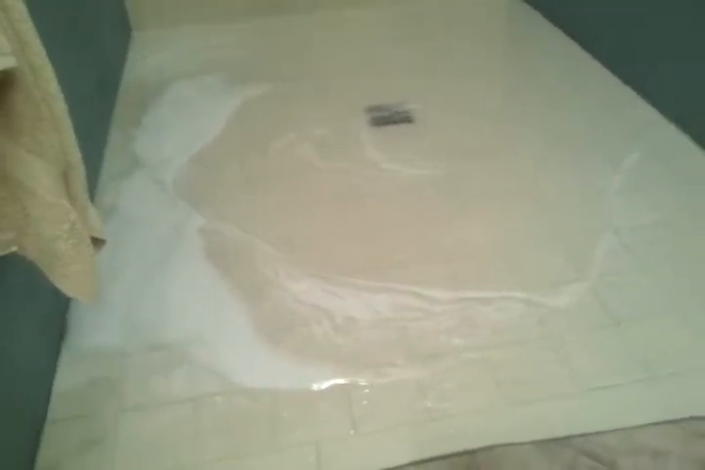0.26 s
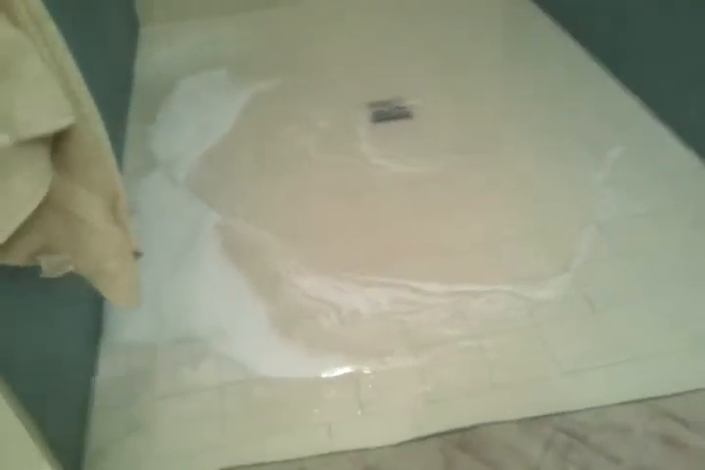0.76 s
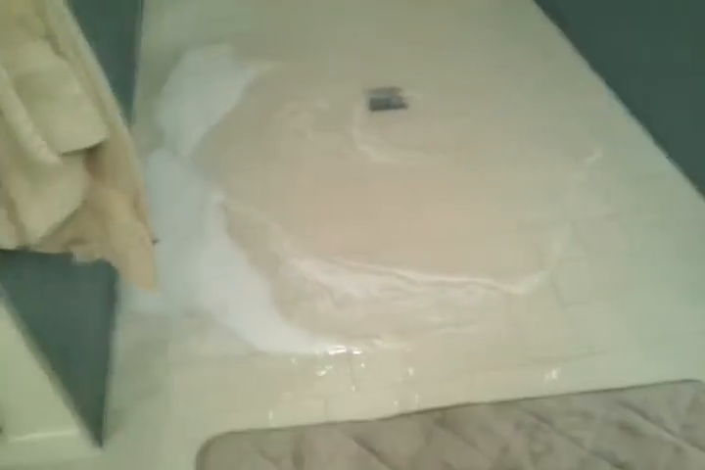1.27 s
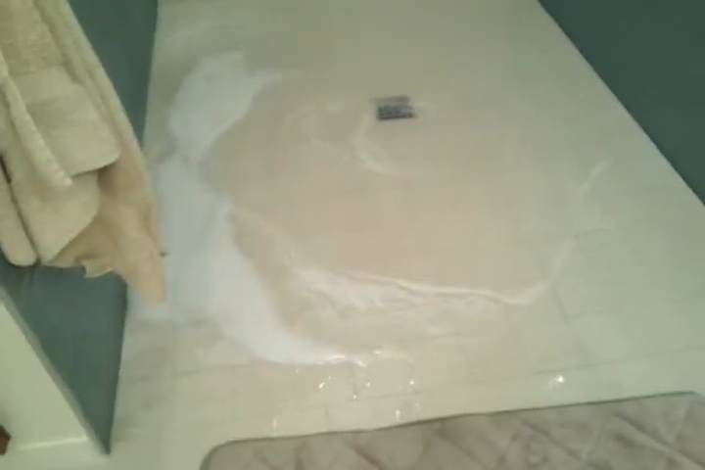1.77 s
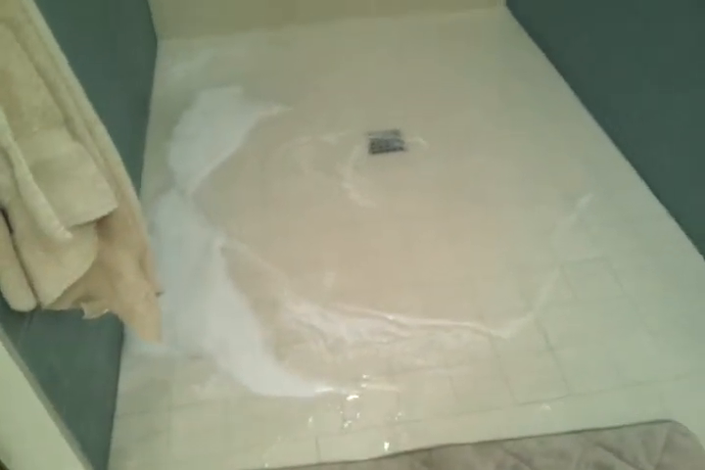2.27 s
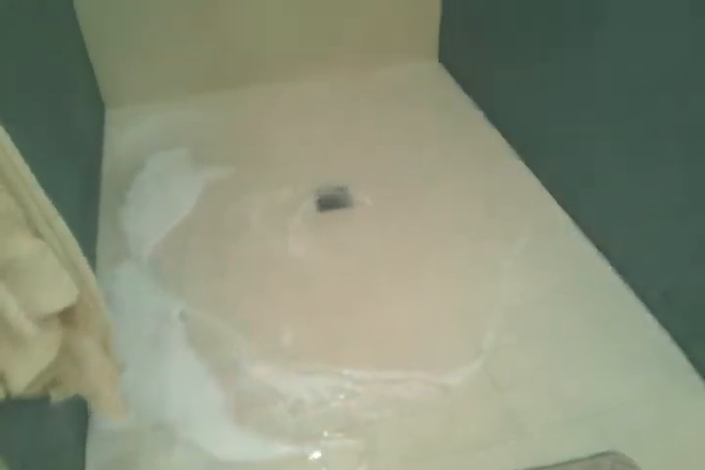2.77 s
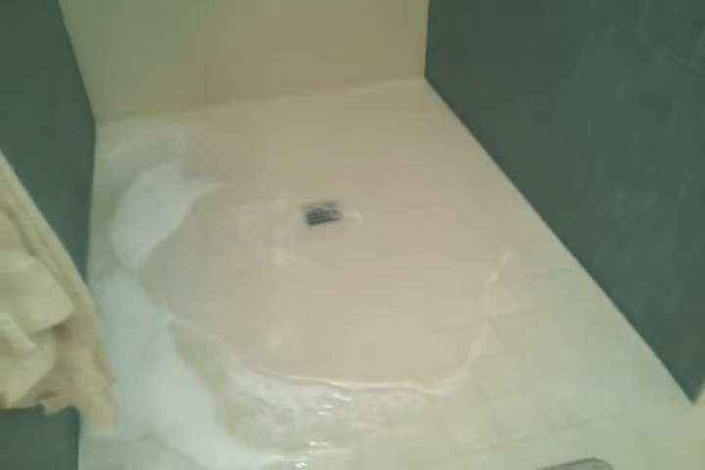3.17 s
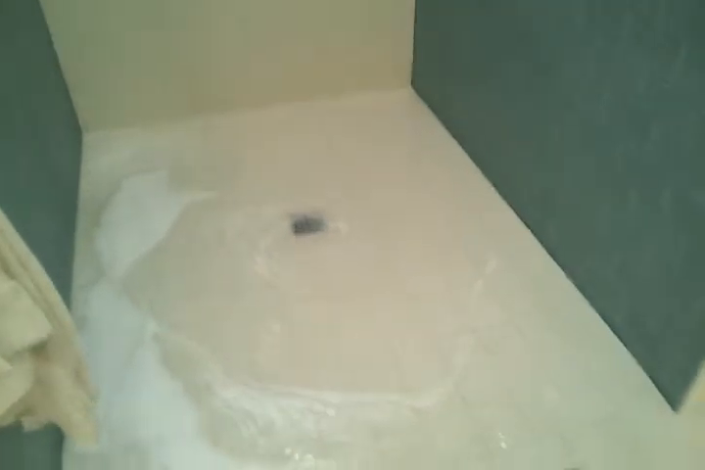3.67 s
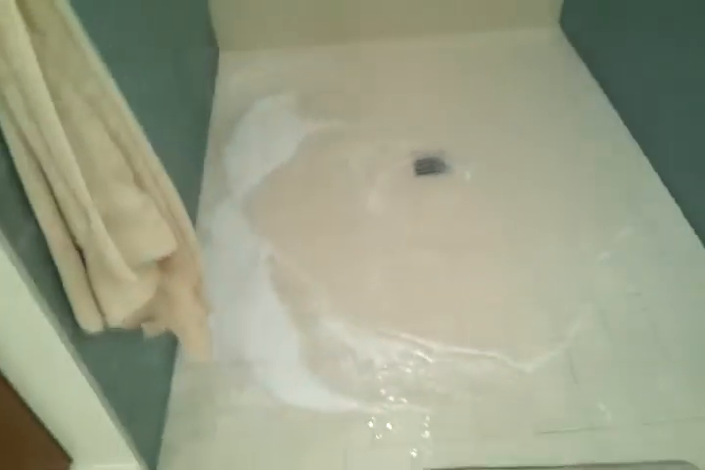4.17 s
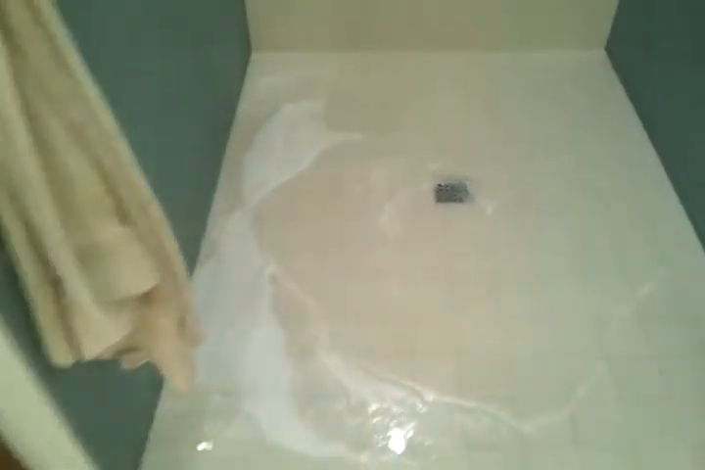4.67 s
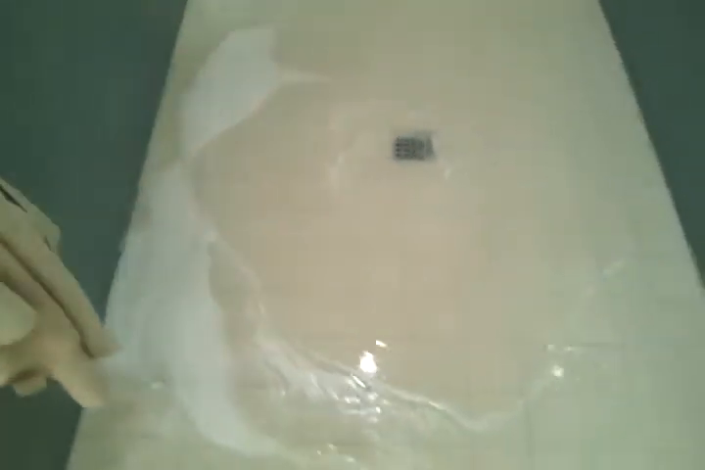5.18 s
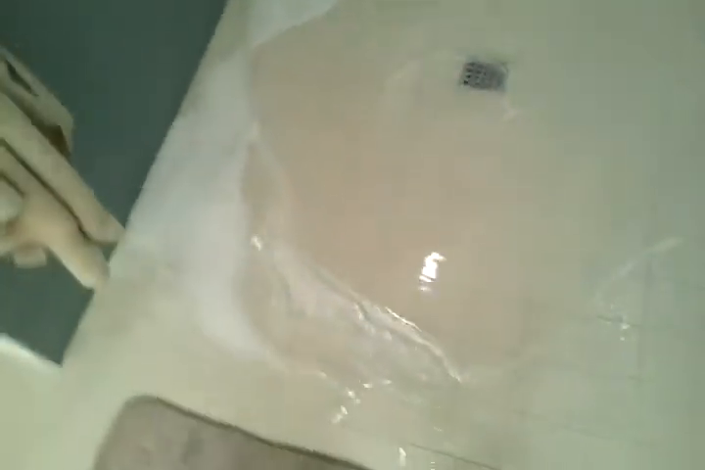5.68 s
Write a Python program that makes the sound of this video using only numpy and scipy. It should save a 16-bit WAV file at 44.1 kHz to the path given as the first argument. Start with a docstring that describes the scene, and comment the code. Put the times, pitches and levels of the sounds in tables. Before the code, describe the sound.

Throughout roughly six seconds, a shower sprays onto a tiled floor with shallow standing water. A dense, bright hiss of fine drops dominates, over splashier middle tones, softer patter and very faint low floor drumming. Tiny bubbles ring within it, and larger ones give brief, rising plops near 0.5, 0.8 and 1.6 to 1.7 seconds. Fingers shift on the hand-held camera: light bumps at about 0.5 to 0.6, dull thuds around 1.2, then a flurry from 1.37 ending in a hard, loud knock at 1.46. The hiss flutters slightly until 1.9, its upper middle less emphasised after the knock. From 2 to 4.5 it stays even and a little quieter, with small plops at 3.2. More plops follow from 4.5, notably near 5.0, 5.3 and 5.7, as the spray swells gently. Short, diffuse hard-wall reverberation; close mono microphone, with nothing above the mid-treble.

```python
"""A shower runs steadily into a shallow pool on the tiled floor of a small, hard-walled stall.
Random drop ticks and clouds of small ringing bubbles make the spray, split into patter, splash and sizzle.
The floor drums softly under it, and now and then a larger bubble plops as a decaying sine of rising pitch.
Fingers shift on the hand-held camera and knock its case, which rings as a handful of damped modes."""
import sys
import numpy as np
from scipy import signal
from scipy.fft import rfft, irfft
from scipy.io import wavfile
from scipy.ndimage import uniform_filter1d

SR = 44100
rng = np.random.default_rng(int(sys.argv[2]) if len(sys.argv) > 2 else 0)


def generate_wav(signal):
    """Clip the signal to [-1, 1] and save it as 16-bit WAV at the path in sys.argv[1]."""
    frames = np.transpose(np.atleast_2d(signal))
    scaled = np.clip(frames, -1, 1) * 32767
    pcm = np.round(scaled).astype(np.int16)
    wavfile.write(sys.argv[1], SR, pcm)


N = 261072
TIME = np.arange(N) / SR
STALL_T60_S = 0.4
USUAL_DB = -27  # the spray's reference level


def undb(db):
    """Decibels to amplitude gain."""
    return 10 ** (np.asarray(db) / 20)


def level(x, db=0):
    """Scale to an rms level in dB."""
    return x * undb(db) / np.sqrt(np.mean(x ** 2))


def decay(t, t60):
    """Exponential ring-down that falls by 60 dB in t60."""
    return np.exp(-np.log(1000) * t / t60)


def add(track, s, sound):
    """Mix a sound into the track at s seconds."""
    start = max(int(s * SR), 0)
    part = track[start:start + len(sound)]
    part += sound[:len(part)]


def colour(x, points):
    """Flatten a sound's broad spectrum, then shape it through (Hz, dB) points on a log-pitch scale."""
    hz, db = np.transpose(points)
    spectrum = rfft(x)
    own_shape = np.sqrt(uniform_filter1d(np.abs(spectrum) ** 2, size=1201) + 1e-9)
    bin_hz = np.maximum(np.arange(len(spectrum)) * SR / N, 1)
    target_db = np.interp(np.log(bin_hz), np.log(hz), db)
    return level(irfft(spectrum / own_shape * undb(target_db), N))


def band(x, lo_hz, hi_hz):
    """Band-pass whose soft edges join up with its neighbours."""
    hz = np.arange(N // 2 + 1) * SR / N

    def below(edge_hz):
        return 1 / (1 + (hz / edge_hz) ** 16)

    return irfft(rfft(x) * (below(hi_hz) - below(lo_hz)), N)


def walk(rate):
    """Smooth random wander of unit spread, with rate new values a second."""
    hold = int(SR / rate)
    steps = np.repeat(rng.standard_normal(N // hold + 1), hold)
    return level(uniform_filter1d(steps, hold)[:N])


def stall(x, wet_db):
    """Echoes blur into a diffuse tail: the energy of each frequency band dies away on fresh noise."""
    size, hop = 1024, 256

    def frames(v):
        return signal.stft(v, nperseg=size, noverlap=size - hop)[2]

    keep = undb(-120 * hop / SR / STALL_T60_S)  # energy left after one hop
    energy = signal.lfilter([0, 1 - keep], [1, -keep], np.abs(frames(x)) ** 2, axis=1)
    diffuse = np.sqrt(energy) * frames(rng.standard_normal(N))
    tail = signal.istft(diffuse, nperseg=size, noverlap=size - hop)[1][:N]
    return (x + level(tail, wet_db) * x.std()) / np.sqrt(1 + undb(2 * wet_db))


def impacts(per_s, spread_db):
    """Drops of many sizes tick at random moments as single-sample clicks of either sign."""
    lands = rng.random(N) < per_s / SR
    size = undb(spread_db * np.minimum(rng.standard_normal(N), 2.6))
    return level(lands * size * rng.choice([-1, 1], N))


def bubble(hz, cycles, rise):
    """A trapped bubble rings for some cycles, its pitch rising as it nears the surface."""
    age = np.linspace(0, 1, int(cycles * SR / hz) + 2)
    return np.sin(2 * np.pi * cycles * age * (1 + rise * age / 2)) * decay(age, 1)


def fizz(count, lo_hz, hi_hz, cycles, spread_db, rise):
    """A cloud of bubbles of random pitch, strength and ring length, born at random moments."""
    out = np.zeros(N)
    for when, pitch, strength, life in rng.random((count, 4)):
        gain = undb(spread_db * min(-np.log(1 - strength), 4))
        hz = lo_hz * (hi_hz / lo_hz) ** pitch
        add(out, when * N / SR, gain * bubble(hz, cycles * (.5 + life), rise))
    return level(out)


def loudness():
    """Level of the spray in dB: a slow drift with a few rounded swells and dips."""
    # spray at the microphone as the camera drifts away and back [t/s, level/dB]
    drift = [(0, -25), (.85, -24), (1.35, -26.5), (2.2, -27), (2.7, -27.5), (4.4, -26.9), (4.8, -26),
             (5.15, -26.4), (5.92, -24.5)]
    # brief swells and dips of the hiss [middle t/s, length/s, level change/dB]
    swells = [(.38, .16, -2), (.76, 0.12, 3), (1.24, .12, 1.5), (1.447, .08, 0.5), (1.524, 0.11, -2),
              (1.6, 0.078, 2), (1.665, 0.092, -2), (1.723, .1, 1), (1.84, .08, -2), (5.26, .09, -2.5)]
    brief = 0
    for s, length, db in swells:
        phase = np.pi * np.clip((TIME - s) / length, -.5, .5)
        brief = brief + db * np.cos(phase) ** 2
    return np.interp(TIME, *np.transpose(drift)) + brief


def spray():
    """Drop ticks and bubbles ring round the stall; three bands follow one level, the treble most."""
    # drop spectrum while a finger lies beside the microphone [f/Hz, relative level per Hz/dB]
    cupped_colour = [(470, -51), (800, -23), (970, -18), (1030, -14), (1110, -10), (1280, -3.5),
                     (1600, -5.5), (2180, -3), (2850, -6.5), (4080, -2.5), (5190, 0), (5770, -3),
                     (6290, -12.5), (7200, -22), (8000, -40.5), (10400, -64), (17600, -120)]
    # drop spectrum with the microphone free [f/Hz, relative level per Hz/dB]
    free_colour = [(470, -40), (800, -21.5), (916, -19.5), (1210, -6), (1450, -6.5), (1760, -5), (1960, -6),
                   (2240, -4), (4000, -4.5), (5190, 0), (5710, -3), (6290, -10.5), (6990, -19.5),
                   (8000, -42), (10400, -62.5), (17600, -120)]
    # patter of the pool, splash on the tile, sizzle of fine drops [low f/Hz, high f/Hz,
    # base level re USUAL_DB/dB, share of the level changes, wander spread/dB, lift beside the finger/dB]
    voices = [(500, 1738, -12, 0.23, 0.27, 0), (1677, 4317, -3.5, 0.46, -0.14, 3),
              (4327, 9200, 0, 0.99, 0.12, 0)]
    finger_lifts_s, lift_length_s = 1.49, 0.048
    wander_per_s = 9

    ticks = impacts(per_s=8000, spread_db=4)
    fine = fizz(count=4500, lo_hz=2600, hi_hz=7530, cycles=49, spread_db=2.0, rise=.08)
    coarse = fizz(count=2000, lo_hz=839, hi_hz=2617, cycles=36, spread_db=2.5, rise=0.19)
    water = stall(ticks + undb(-12.5) * fine + undb(-13.5) * coarse, wet_db=-0.5)

    # a finger beside the microphone forms a small cavity that lifts the upper middle
    cupped = np.clip(.5 + (finger_lifts_s - TIME) / lift_length_s, 0, 1)
    water = cupped * colour(water, cupped_colour) + (1 - cupped) * colour(water, free_colour)

    change_db = loudness() - USUAL_DB
    out = np.zeros(N)
    for lo_hz, hi_hz, db, share, wander_db, lift_db in voices:
        moving_db = share * change_db + wander_db * walk(wander_per_s) + lift_db * cupped
        out += level(band(water, lo_hz, hi_hz), USUAL_DB + db) * undb(moving_db)
    return out


def drumming():
    """The floor answers the drops with a low, soft rumble: sparse impacts, blurred and darkened."""
    # dull spectrum of the floor [f/Hz, relative level per Hz/dB]
    floor_colour = [(20, -7.5), (50, -5), (85, 0), (150, -7), (220, -1), (290, -4), (420, -3), (600, -3.5),
                    (800, -3), (1100, -32)]
    # strength of the drumming over its base level [t/s, level/dB]
    swell = [(0, 6.5), (.55, 4.5), (.8, 4), (1, 8), (1.6, 5), (4.9, 4.5), (5.3, 6.5), (5.92, 6)]
    base_db = -58
    rumble = colour(stall(impacts(per_s=700, spread_db=4.0), wet_db=4.0), floor_colour)
    return level(rumble, base_db) * undb(np.interp(TIME, *np.transpose(swell)))


def plops():
    """Single large bubbles among a scatter of fainter ones, all with a diffuse echo off the walls."""
    # larger bubbles in the pool and drain [t/s, starting pitch f/Hz, level ahead of the stall/dB]
    large_bubbles = [(.49, 1387, -22), (0.771, 1407, -24.5), (.89, 1066, -29.5), (1.566, 907, -29),
                     (1.71, 1033, -27.5), (3.19, 873, -32), (3.22, 800, -33), (3.24, 1757, -21.5),
                     (4.53, 927, -31), (4.87, 860, -33), (4.97, 1445, -24), (5.26, 615, -39),
                     (5.279, 1069, -27), (5.42, 977, -31), (5.48, 1104, -30), (5.62, 230, -41),
                     (5.67, 1360, -23.5), (5.69, 1196, -24), (5.88, 973, -32.5)]
    faint_db = -45  # level of the scatter ahead of the stall
    out = undb(faint_db) * fizz(count=200, lo_hz=930, hi_hz=1350, cycles=90, spread_db=1, rise=.08)
    for s, hz, db in large_bubbles:
        add(out, s, undb(db) * bubble(hz, cycles=3.0 * np.sqrt(hz), rise=.15))
    return stall(out, wet_db=1.0)


def knocks():
    """Each touch pushes the case briefly, then the skin drags; a longer, softer push favours low modes."""
    # fingers on the case [t/s, peak level ahead of the low cut/dB, contact time/ms,
    # boom of the case/dB, buzz of its panel/dB]
    touches = [(.531, -34.5, 1.8, 4, -15), (.592, -35.5, 1.1, -1, -17), (.997, -45, 2.1, 2, -8),
               (1.158, -26.5, 2, 2, 2), (1.179, -27.5, 3.2, 1, -4), (1.187, -41, 2.5, -14, 3),
               (1.261, -31, 4.2, 0, -5), (1.371, -19.5, 2.5, -18, 5.5), (1.397, -28.5, 3.8, -17, 8),
               (1.436, -32, 1.6, -6, 0), (1.4582, -9, 1.2, 1, -6), (1.4663, -24, 0.93, 12, -2.5)]
    # modes of the case, boom and panel buzz first; each touch shifts those two [f/Hz, level/dB, t60/s]
    case_modes = [(111.6, -7, 0.15), (226, 6, 0.023), (75, -17, 0.034), (398, 7.5, 0.017),
                  (586, -3.5, 0.021), (830, -2, 0.013)]
    out = np.zeros(N)
    t = TIME[:SR // 4]
    modes = [undb(db) * np.cos(2 * np.pi * hz * t) * decay(t, t60) for hz, db, t60 in case_modes]
    boom, buzz, *others = modes
    for s, db, contact_ms, boom_db, buzz_db in touches:
        push = np.hanning(max(int(contact_ms * SR / 1000), 3))
        force = undb(-30.0) * rng.standard_normal(len(t)) * np.exp(-t / 0.011)  # skin drag
        force[0] += 1  # the knock itself
        ring = undb(boom_db) * boom + undb(buzz_db) * buzz + sum(others)
        knock = signal.fftconvolve(ring, np.convolve(force, push))
        add(out, s, -undb(db) * knock / np.abs(knock).max())
    # the microphone passes little below the lowest mode
    low_cut = signal.butter(2, 45, "high", fs=SR, output="sos")
    return signal.sosfilt(low_cut, out)


def scene():
    """Water in the stall and handling of the camera, in mono."""
    return (spray() + drumming() + plops() + knocks())[None]


def record(dry):
    """The camera cuts the treble off steeply."""
    top_hz = 8800
    treble_cut = signal.ellip(8, .2, 80, top_hz, fs=SR, output="sos")
    return signal.sosfilt(treble_cut, dry)


dry = scene()
out = record(dry)
generate_wav(out)
```